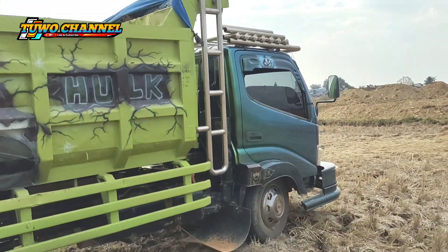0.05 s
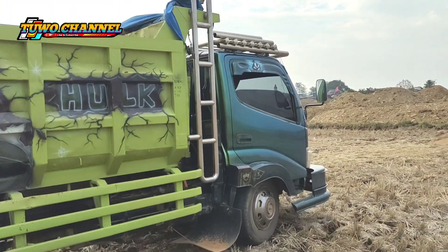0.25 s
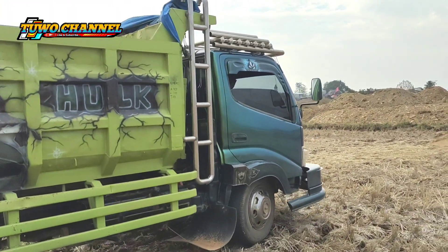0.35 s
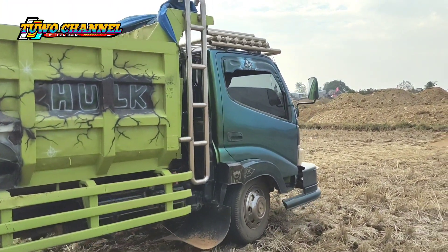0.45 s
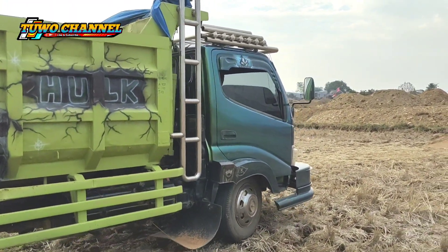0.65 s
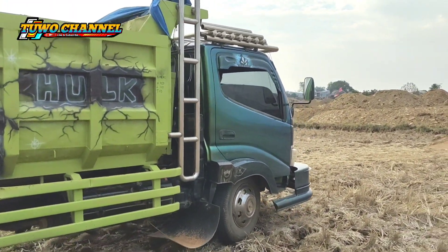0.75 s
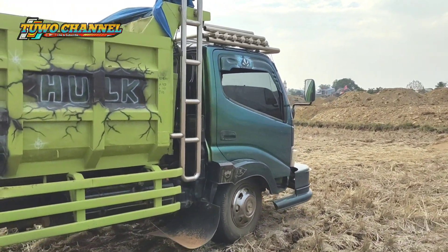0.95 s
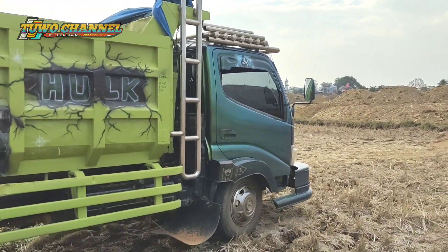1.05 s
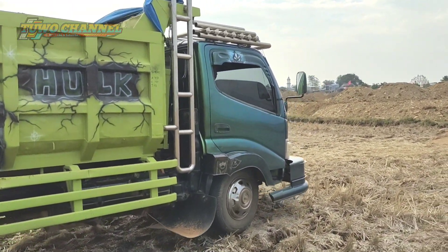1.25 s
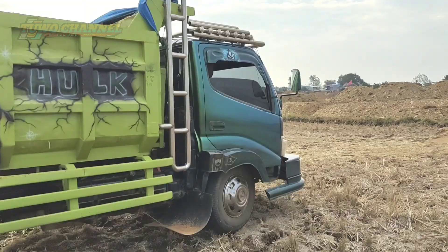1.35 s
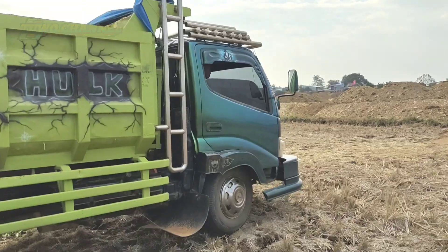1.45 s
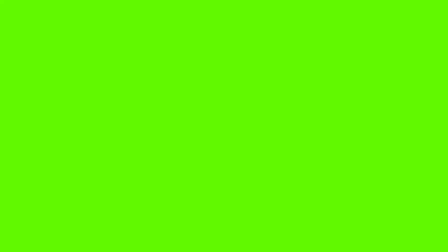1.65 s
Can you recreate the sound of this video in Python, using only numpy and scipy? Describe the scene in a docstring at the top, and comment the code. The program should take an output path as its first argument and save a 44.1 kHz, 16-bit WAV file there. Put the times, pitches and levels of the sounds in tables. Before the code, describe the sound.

One clank and shudder from a heavy truck's tipper body while the diesel idles.

```python
"""An open dry field, with a dump truck idling a little to the right of the microphone.
Its steel tipper body clanks against the frame in one quick chatter of contacts, then the big
panels boom and shudder as it settles. The diesel drones and clatters at each firing, and
something squeaks roughly in step. Behind it are a faint hiss, one dry tick and soft bumps on
the microphone; the sound fades out quickly at the end."""
import sys
import numpy as np
from scipy import signal
from scipy.fft import rfft, irfft, next_fast_len
from scipy.io import wavfile
from scipy.ndimage import uniform_filter1d, minimum_filter1d, map_coordinates

SR = 44100
rng = np.random.default_rng(int(sys.argv[2]) if len(sys.argv) > 2 else 0)


def waveform_to_disk(signal):
    """Save audio, clipped to [-1, 1], as 16-bit WAV at the path in sys.argv[1]."""
    frames = np.transpose(np.atleast_2d(signal))
    scaled = np.clip(frames, -1, 1) * 32767
    samples = np.round(scaled).astype(np.int16)
    wavfile.write(sys.argv[1], SR, samples)


N = 74970

# steel-on-steel hits: t/s, level/dB, top f/Hz, crack against ring/dB
CONTACTS = [(0.2563, -15, 11900, -1), (0.2602, -7.5, 5500, -6), (0.2668, -18, 3000, -1.5),
            (.2758, -23, 2600, -7), (.2852, -7, 1950, -18), (.299, -24, 2490, -1), (.349, -24.5, 1900, -2),
            (0.363, -30, 1820, -7.5), (.379, -21.5, 1890, -1.5), (.392, -17, 1820, -1),
            (.441, -15, 1680, 0)]
# ring of the struck steel: f/Hz, level/dB, t60/s
STEEL_MODES = [(822, -12, 0.2), (1385, -14, .14), (1605, -17, 0.14), (1830, -19, 0.22), (1919, 1, 0.08),
               (2155, 1, 0.05), (2289, -6, 0.07), (2634, -12, 0.11), (3215, -11, 0.14), (3900, -1, 0.04),
               (4250, -4, 0.04), (7050, -17.5, .03)]
# bright snap at the instant of contact: f/Hz, level/dB
SNAP_EQ = [(1000, -12.5), (2600, 2), (4200, 6), (5400, -6), (7300, -7.5), (8500, -15), (15000, -12.5)]
# noisy crack behind the snap: f/Hz, level/dB
CRACK_EQ = [(300, -1), (700, 0), (1200, -4.5), (2100, 0), (3000, -2.5), (4200, -6.5), (5400, -8.5),
            (7300, -11.5), (8500, -26), (15000, -24.5)]
# tail of the crack: f/Hz, t60/s
CRACK_DECAY = [(500, 0.28), (2000, 0.24), (4000, 0.11), (9000, 0.089)]


def clank(attack_cycles=1.1, snap_t60_s=.02, ring_db=-6, noise_db=-1.5):
    """Steel snaps against steel and chatters; softer contacts are duller and slower to build."""
    out, t = np.zeros((2, N)), clock()
    for s, db, top_hz, crack_db in CONTACTS:
        lowpass = lambda hz: 1 / np.sqrt(1 + (hz / top_hz) ** 8)
        attack = 1 - np.exp(-(t * top_hz / attack_cycles) ** 2)
        snap = decay(snap_t60_s) * noise(SNAP_EQ)
        crack = amp(noise_db + crack_db) * filtered(snap + burst(CRACK_EQ, CRACK_DECAY), lowpass)
        steel = amp(ring_db) * ring(STEEL_MODES, lowpass)
        add(out, s, amp(db) * attack * (steel + crack))
    return pan(out, db=1.64)


# shudders of the settling body: t/s, level/dB, centre f/Hz of the push, thud against boom/dB
BODY_LURCHES = [(.2567, -13.5, 480, 7), (.2662, -6.5, 397, -10), (.2785, -15.5, 317, -5),
                (.3215, -12.5, 413, -5), (.3551, -15, 115, -6), (.3855, -15, 233, -5), (.4236, -12, 130, 8),
                (.4535, -11, 383, -2), (.478, -13, 128, 0), (.5202, -14, 128, 1), (.5551, -19.5, 101, 0),
                (.6063, -22, 109, 0), (.6259, -20.5, 223, -4), (.668, -21.5, 225, -5)]
# boom of the panels: f/Hz, level/dB, t60/s
PANEL_MODES = [(63, -3, .55), (117, -8, .9), (129.4, -1.5, .84), (157.7, -5, 1.05), (194.2, -7, .7),
               (212.1, -5, 1.25), (220.2, 5, .28), (235.8, -3.5, .47), (271.8, -2, .41), (294.1, -7, .21),
               (361.1, -11.5, .6), (429.8, -12.5, .7), (455.9, -15.5, .6), (548, -15, .41), (645, -15, .3)]
# dull thud under the boom: f/Hz, level/dB
THUD_EQ = [(30, -33.5), (60, -29), (110, -11.5), (225, -0.5), (300, -1), (480, -10.5), (700, -20.5),
           (1200, -20.5), (3000, -49.5)]
# tail of the thud: f/Hz, t60/s
THUD_DECAY = [(80, 0.18), (300, 0.29), (1000, 0.35)]


def tipper_body(attack_s=.0012, boom_db=-2.7, push_octaves=.85):
    """Each lurch thuds and sets the big panels booming, most strongly near the pitch of its push."""
    out = np.zeros((2, N))
    attack = 1 - np.exp(-clock() / attack_s)
    for s, db, centre_hz, thud_db in BODY_LURCHES:
        push = lambda hz: hump(hz, centre_hz, push_octaves)
        thud = amp(thud_db) * filtered(burst(THUD_EQ, THUD_DECAY), push)
        boom = amp(boom_db) * ring(PANEL_MODES, push)
        add(out, s, amp(db) * attack * (boom + thud))
    return pan(out, db=-.8)


# pulse of the idle: t/s, firing rate/Hz
FIRING_RATE = [(0, 21.4), (.2, 20.2), (.35, 19.1), (.65, 19.7), (1.1, 22), (1.25, 20.6), (1.7, 21.4)]
# low engine bed: f/Hz, level/dB
DRONE_EQ = [(25, -38), (50, -4.5), (80, -1.5), (130, 1.5), (220, -0.5), (300, -4), (450, -8), (650, -16.5),
            (900, -10.5), (1400, -17), (2000, -13.5), (3000, -23.5), (4000, -36.5), (8000, -52)]
# swell of that bed: t/s, level/dB
DRONE_RIDE = [(0, -28), (.2, -24.5), (.7, -27), (1.1, -29), (1.3, -34), (1.6, -33)]
# colour of the diesel clatter: f/Hz, level/dB
CLATTER_EQ = [(200, -11), (450, -10), (620, -6.5), (850, 3.5), (1100, 1), (1450, -3), (1900, 2.5),
              (2300, -2.5), (2800, -2.5), (3600, -17), (5600, -25), (6900, -12), (8500, -22),
              (15000, -24.5)]
# weight of the clatter: t/s, level/dB
CLATTER_RIDE = [(0, -32), (.08, -32.5), (.17, -36), (.55, -39.5), (.68, -30), (.78, -33.5), (.95, -34.5),
                (1.1, -34.5), (1.25, -31.5), (1.38, -32), (1.48, -32.5), (1.6, -36)]
# accents over the idle: t/s, level/dB, centre f/Hz, ring against knock/dB
HARD_KNOCKS = [(0.068, -23, 1623, -5.5), (0.111, -26, 1430, -20), (0.215, -27.5, 3580, -28),
               (0.624, -27, 2020, -21), (0.68, -22.5, 2450, -10), (0.83, -25.5, 1900, -15),
               (0.869, -38, 5000, -22), (0.883, -29, 1230, -3), (0.984, -31.5, 1060, -6),
               (1.03, -32, 4900, -29), (1.037, -25.5, 1926, -14), (1.086, -28.5, 1360, -23),
               (1.15, -29, 1660, -7.5), (1.186, -32, 4900, -25), (1.189, -27, 944, -1),
               (1.294, -31.5, 1085, -5.5), (1.332, -31.5, 3320, -15), (1.433, -30.5, 2160, -12)]


def engine(first_firing_s=.0145, scatter_db=1, knock_octaves=.83, ring_t60_s=.15):
    """A low drone and a burst of clatter at every firing; harder knocks ring a loose metal part."""
    t = clock()
    count = np.cumsum(curve(FIRING_RATE)) / SR
    firings = first_firing_s + np.interp(np.arange(int(count[-1])), count, t)
    out = amp(curve(DRONE_RIDE)) * noise(DRONE_EQ)
    clatter = noise(CLATTER_EQ)
    for s, db, centre_hz, ring_db in HARD_KNOCKS:
        band = filtered(noise(CLATTER_EQ), lambda hz: hump(hz, centre_hz, knock_octaves))
        out += amp(db) * knock(s) * unit(band)
        tone = np.sqrt(2) * np.sin(2 * np.pi * centre_hz * t)
        add(out, s, amp(db + ring_db) * decay(ring_t60_s) * tone)
    pulses = sum(amp(scatter_db * rng.normal()) * knock(s) for s in firings)
    return pan(out + amp(curve(CLATTER_RIDE)) * pulses * clatter, db=-.05)


def knock(s, rise_s=.002, fall_s=.015):
    """The punchy envelope of one firing at time s, peak 1."""
    age = np.maximum(clock() - s, 0)
    shape = (1 - np.exp(-(age / rise_s) ** 2)) * np.exp(-age / fall_s)
    return shape / (shape.max() + 1e-9)


# thin squeaks: middle t/s, length/s, f/Hz, level before trim/dB, pitch jitter/Hz
CHIRPS = [(.39, .025, 3080, -44, 40), (.435, .028, 3030, -41, 40), (.483, .018, 3040, -44, 40),
          (.508, .022, 3120, -43, 40), (.53, .024, 2980, -41, 25), (.574, .046, 3000, -37, 20),
          (.618, .024, 2970, -43, 40), (.648, .03, 3040, -43, 30), (.672, .024, 2950, -33.5, 25),
          (.708, .035, 2960, -43, 40), (.765, .035, 2920, -38, 80), (.824, .018, 2950, -38, 110),
          (.877, .018, 2880, -31, 190), (.932, .018, 2780, -40, 150), (.988, .018, 2820, -37, 180),
          (1.039, .018, 2740, -35, 220), (1.093, .022, 2830, -37, 100), (1.194, .02, 2850, -35, 160),
          (1.246, .018, 2930, -40, 140), (1.339, .018, 3000, -38, 220), (1.368, .03, 3280, -44, 90),
          (1.495, .03, 3070, -45, 110), (1.56, .045, 2980, -44, 30)]


def squeaks(sag_hz_per_s=4200, trim_db=1.5):
    """Short chirps, clean or rough, that sag in pitch: perhaps the belt slipping as the engine fires."""
    out = np.zeros(N)
    for s, length, hz, db, jitter_hz in CHIRPS:
        t = clock() - s
        pitch = hz - sag_hz_per_s * t + jitter_hz * wobble(400)
        tone = np.sqrt(2) * np.sin(2 * np.pi * np.cumsum(pitch) / SR)
        out += amp(trim_db + db) * np.exp(-(2 * t / length) ** 2) * tone
    return pan(out, db=-1)


# soft low bumps: t/s, level/dB, f/Hz
MIC_BUMPS = [(1.033, -35, 97), (1.157, -26, 118), (1.351, -38, 80.8), (1.47, -35.5, 114),
             (1.556, -37.5, 109.9)]


def bumps(half_length_s=.012):
    """Soft bumps on the microphone, each a few low cycles, heavier on the right."""
    out = np.zeros(N)
    for s, db, hz in MIC_BUMPS:
        t = clock() - s
        tone = np.sqrt(2) * np.cos(2 * np.pi * hz * t)
        out += amp(db) * np.exp(-(t / half_length_s) ** 2) * tone
    return pan(out, db=-6.5)


# colour of the hiss and the tick: f/Hz, level/dB
HISS_EQ = [(500, -3.5), (3000, 8.5), (4500, -3), (5700, -2), (6900, 1.5), (8500, -4), (14500, -7.5),
           (16000, -31)]
# drift of the hiss: t/s, level/dB
HISS_RIDE = [(0, -40), (.15, -44), (.5, -47), (.75, -41.5), (1.15, -47.5), (1.3, -39.5), (1.39, -44.5),
             (1.45, -42), (1.52, -48)]


def stubble(flutter_db=1, tick_s=1.4185, tick_db=-33.5, tick_t60_s=.065):
    """A faint hiss over the stubble and one dry tick, perhaps a straw snapping."""
    out = amp(curve(HISS_RIDE) + flutter_db * wobble(40)) * noise(HISS_EQ)
    add(out, tick_s, amp(tick_db) * decay(tick_t60_s) * noise(HISS_EQ))
    return out


# stereo width of every noise layer: f/Hz, scattered share of the power
WIDTH = [(60, 0.51), (300, 0.02), (800, 0.39), (3000, 0.3), (8000, 0.89), (15000, 0.85)]


def noise(spectrum):
    """Stereo noise of rms 1: a direct part common to both sides and a scattered part."""
    white = rng.standard_normal((3, N))
    share = lambda hz: np.clip(along(WIDTH, hz), 0, 1)
    direct = filtered(white[0], lambda hz: np.sqrt(1 - share(hz)))
    scattered = filtered(white[1:], lambda hz: np.sqrt(share(hz)))
    return unit(filtered(direct + scattered, lambda hz: amp(along(spectrum, hz))))


def burst(spectrum, t60s):
    """Noise standing for countless small modes, each band dying at its own speed."""
    hz, t, bands = signal.stft(noise(spectrum), SR, nperseg=256)
    tails = amp(-60 * t / along(t60s, hz)[:, None])
    return signal.istft(bands * tails, SR, nperseg=256)[1][:, :N]


def ring(modes, weight, scatter_db=1):
    """Damped modes, each struck a little differently every time."""
    out, t = np.zeros(N), clock()
    for hz, db, t60 in modes:
        strength = weight(hz) * amp(db + scatter_db * rng.normal())
        out += strength * decay(t60) * np.sin(2 * np.pi * hz * t)
    return out


def amp(db):
    """Decibels to gain."""
    return 10 ** (np.asarray(db) / 20)


def unit(x):
    """Scale to rms 1."""
    return x / np.sqrt(np.mean(x ** 2) + 1e-20)


def clock():
    """The time of each sample."""
    return np.arange(N) / SR


def decay(t60):
    """A tail that falls 60 dB in t60 seconds."""
    return amp(-60 * clock() / t60)


def along(points, hz):
    """Read (f/Hz, value) points on a log axis."""
    f, v = np.transpose(points)
    return np.interp(np.log(hz + 1), np.log(f + 1), v)


def curve(rows):
    """Join (t/s, value) points, one value per sample."""
    return np.interp(clock(), *np.transpose(rows))


def wobble(rate):
    """A smooth random curve, rate knots a second."""
    return map_coordinates(rng.standard_normal(int(N * rate / SR) + 4), [clock() * rate])


def filtered(x, response):
    """Shape x with a frequency response."""
    m = next_fast_len(N + 8192)
    return irfft(rfft(x, m) * response(np.fft.rfftfreq(m, 1 / SR)), m)[..., :N]


def hump(hz, centre_hz, octaves):
    """A broad emphasis round a centre frequency."""
    return 1 / np.sqrt(1 + (np.log2((hz + 1) / centre_hz) / octaves) ** 4)


def add(out, s, x):
    """Mix x into out from time s."""
    i = max(round(s * SR), 0)
    out[:, i:] += x[..., :N - i]


def pan(x, db):
    """Raise the left by db and lower the right as much; negative leans right."""
    return x * amp([[db], [-db]])


def delayed(x, lag_s):
    """Let the left side arrive lag_s later than the right."""
    return filtered(x, lambda hz: np.exp(1j * np.pi * hz * lag_s * np.array([[-1], [1]])))


def scene():
    """The truck and the field, each layer reaching the right side first."""
    return (delayed(clank(), lag_s=.0004504)
            + delayed(tipper_body(), lag_s=.00028)
            + delayed(engine(), lag_s=.00023)
            + delayed(squeaks() + bumps() + stubble(), lag_s=.000405))


# master fade: t/s, level/dB
FADE_OUT = [(1.57, -1.5), (1.62, -8), (1.648, -19.5), (1.66, -83)]


def record(dry, low_cut_hz=78, ceiling=1, top_hz=15600):
    """The microphone loses the deep bass; then a fast limiter, a quick closing fade and a high cut."""
    highpass = lambda hz: (1j * hz) ** 2 / (low_cut_hz ** 2 - hz ** 2 + 1j * hz * low_cut_hz)
    heard = filtered(dry, highpass)
    needed = np.minimum(1, ceiling / (np.abs(heard).max(axis=0) + 1e-9))
    limiter = uniform_filter1d(minimum_filter1d(needed, size=301), size=301)
    return filtered(heard * limiter * amp(curve(FADE_OUT)), lambda hz: hz < top_hz)


dry = scene()
out = record(dry)
waveform_to_disk(out)
```